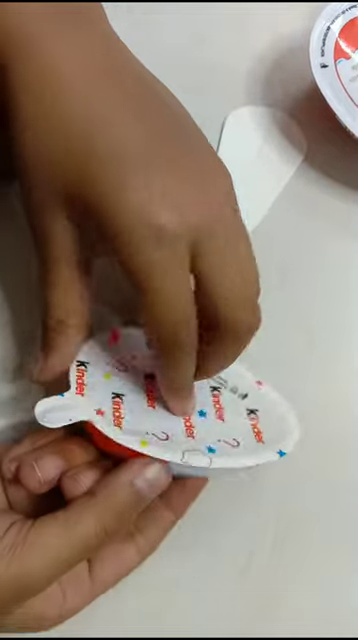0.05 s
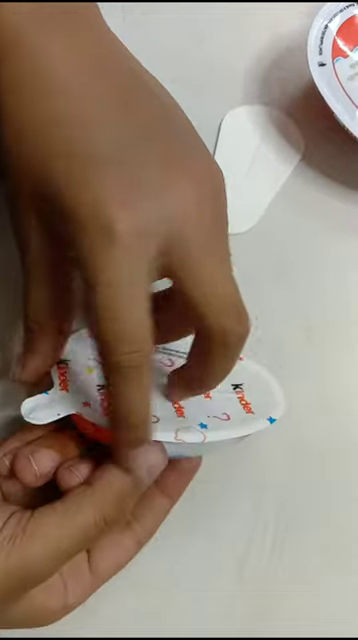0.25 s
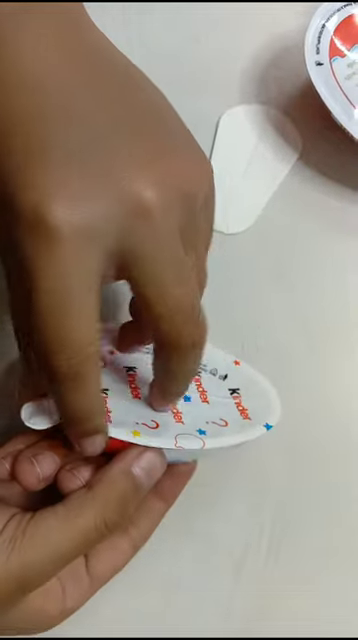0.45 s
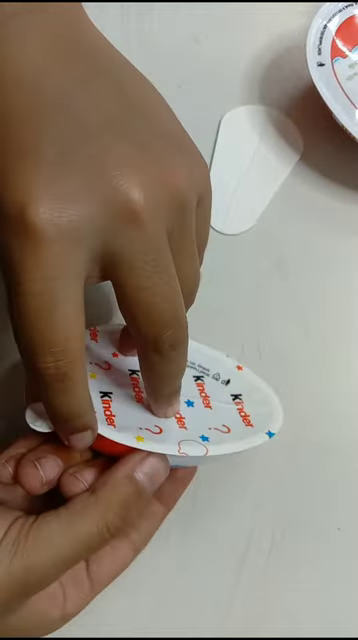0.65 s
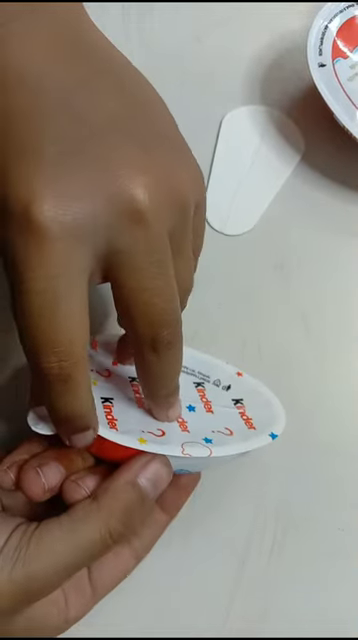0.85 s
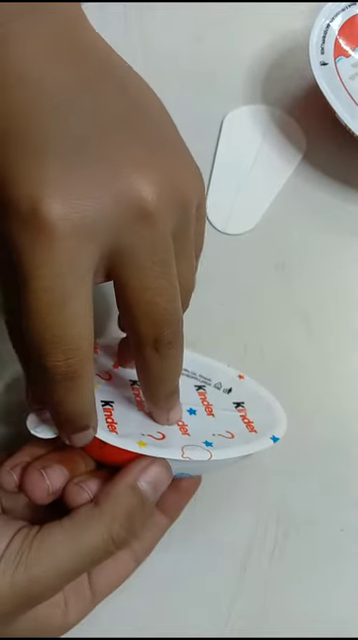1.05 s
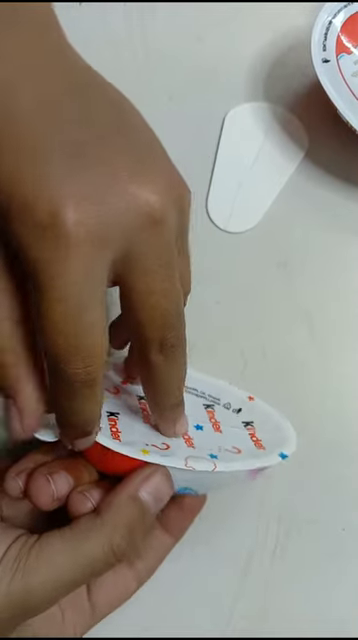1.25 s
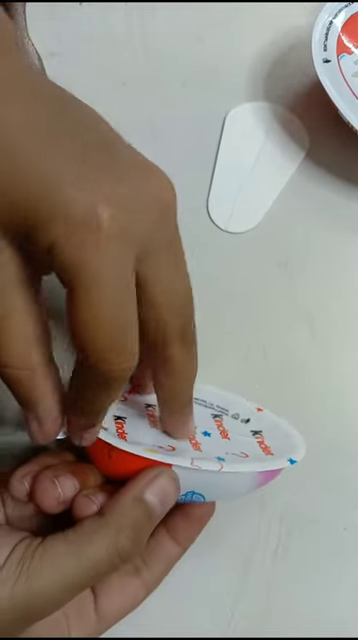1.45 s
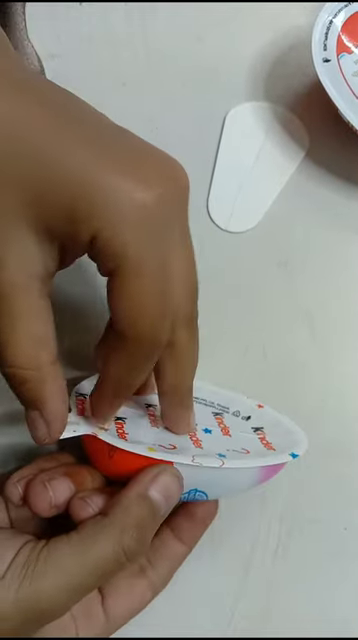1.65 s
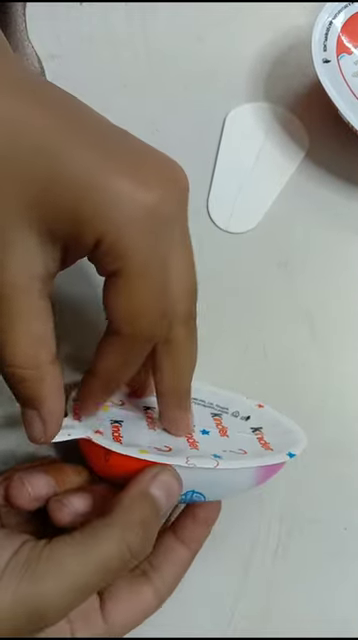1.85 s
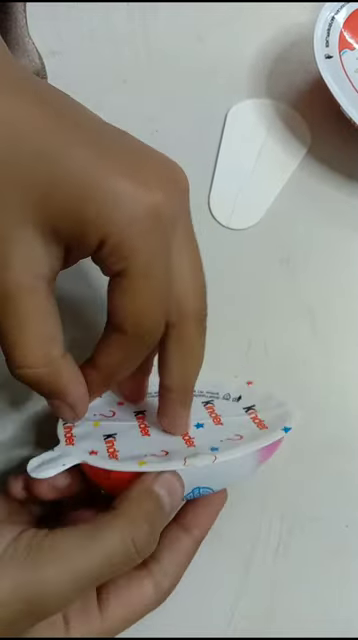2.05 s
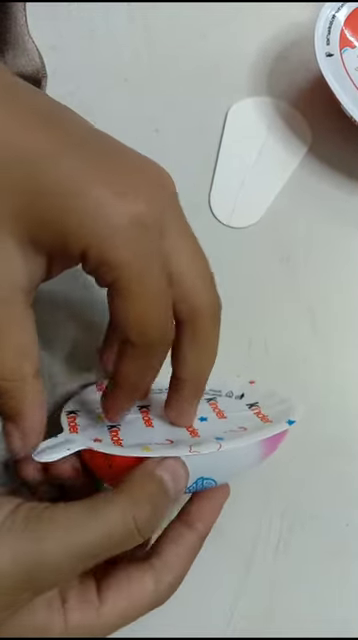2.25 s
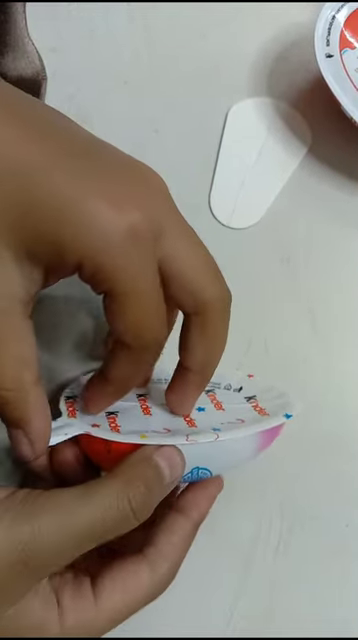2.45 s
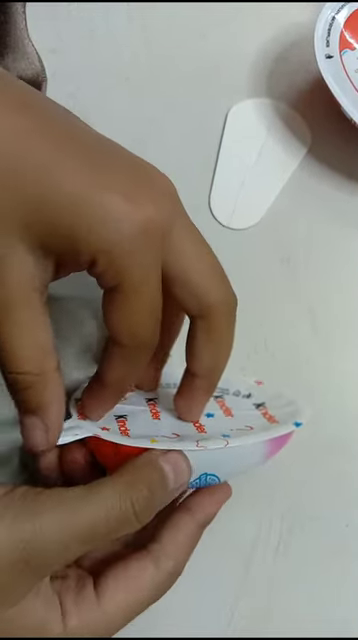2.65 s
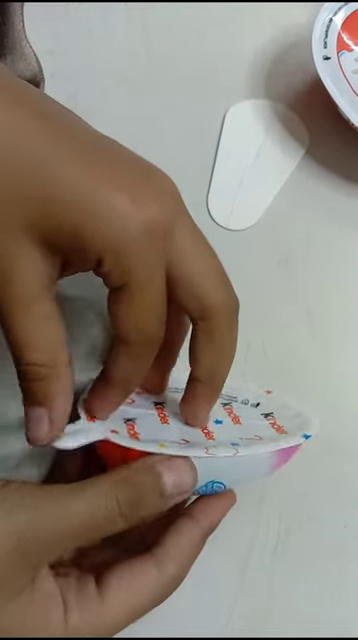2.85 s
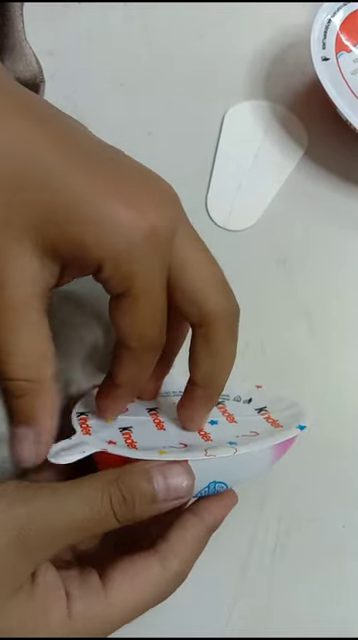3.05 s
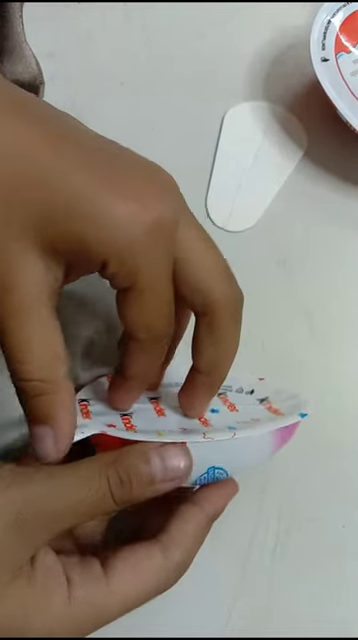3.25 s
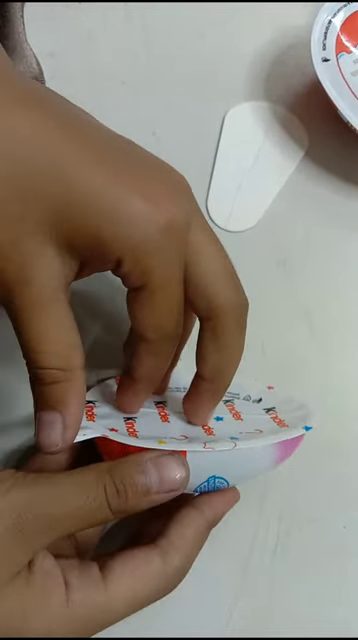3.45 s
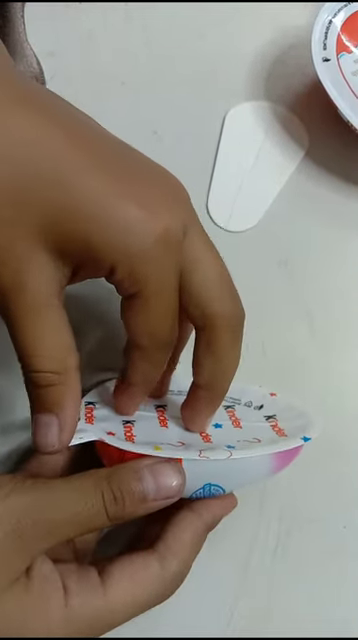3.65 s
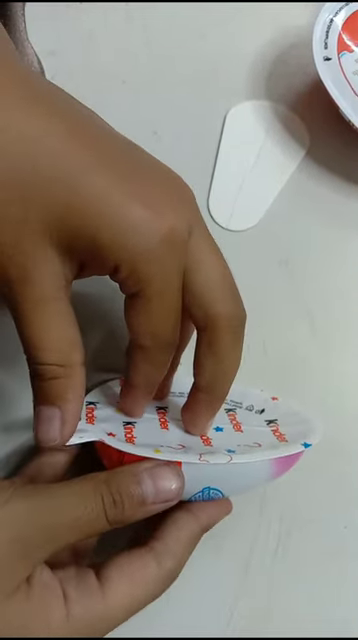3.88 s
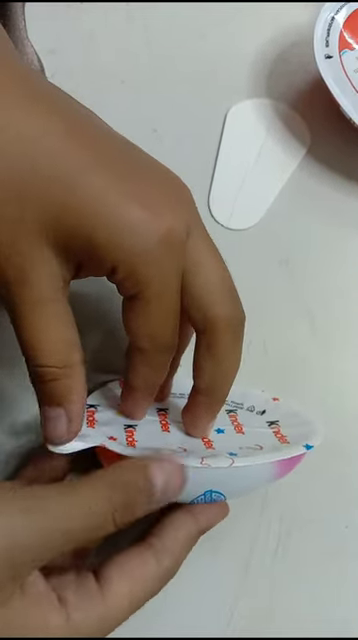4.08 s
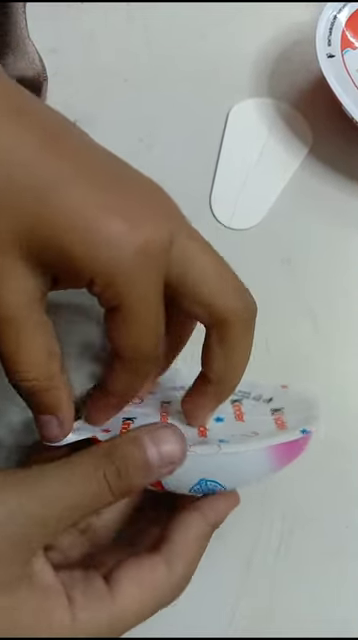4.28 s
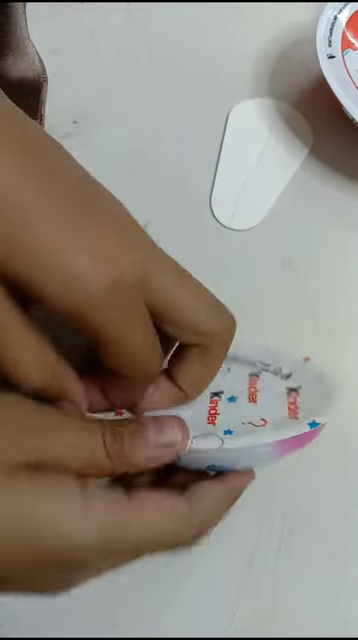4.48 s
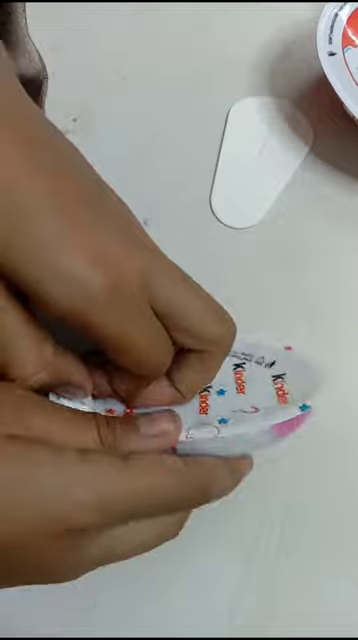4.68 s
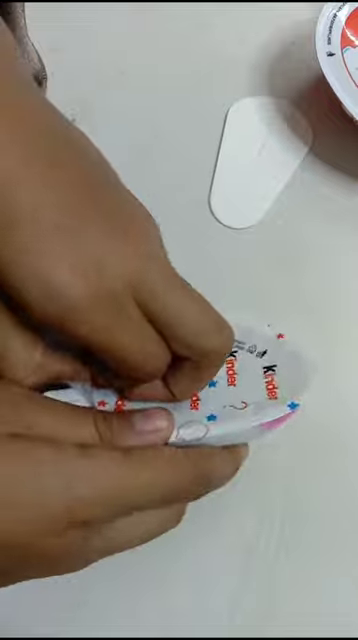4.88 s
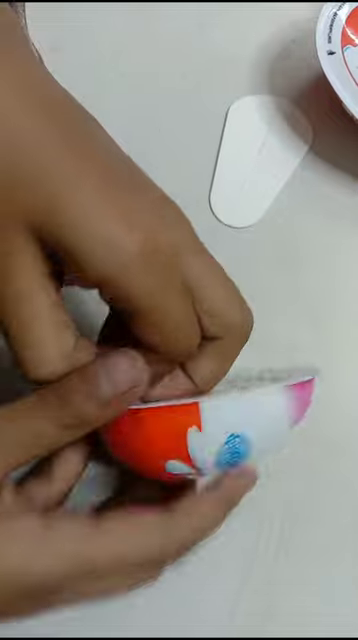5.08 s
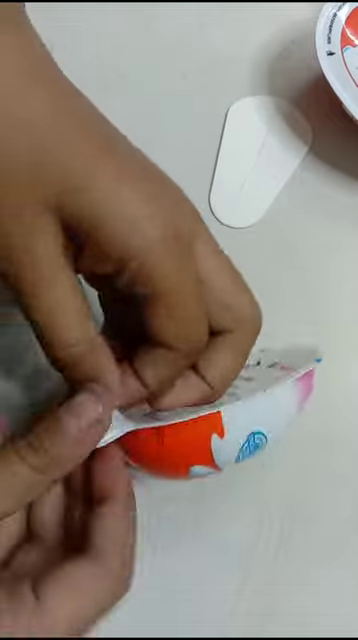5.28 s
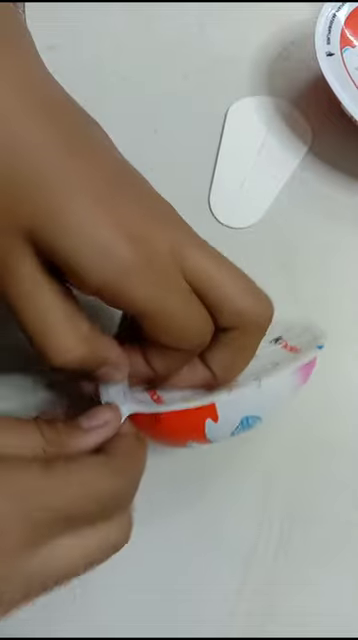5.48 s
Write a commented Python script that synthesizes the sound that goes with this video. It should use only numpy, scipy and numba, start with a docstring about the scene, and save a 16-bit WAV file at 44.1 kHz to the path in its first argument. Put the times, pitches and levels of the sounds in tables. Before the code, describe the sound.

Fingers rub and pick at a foil seal on a hollow plastic shell, faint crinkles building to sharp clicks and snaps.

```python
"""A quiet room, a table, a phone's microphone close by: fingers pick at the foil seal of a hollow plastic shell.
Skin rubs the foil in dense tiny slips: uneven noise through the modes of foil, shell wall and hollow.
The tab snaps in noise bursts of a few ms; the air in the shell hums as noise in a narrow gliding band.
The table thrums under the wrists as one noise-driven mode over a rumble. A short diffuse tail follows the
hands; smooth hiss and faint steady tones lie beneath."""
import sys
import numpy as np
from scipy import signal
from scipy.fft import rfft, irfft, next_fast_len
from scipy.io import wavfile
from scipy.ndimage import uniform_filter1d
from numba import njit

SR = 44100
rng = np.random.default_rng(int(sys.argv[2]) if len(sys.argv) > 2 else 0)


def to_wav(s):
    """Save 16-bit WAV."""
    ch = np.atleast_2d(s).T  # columns
    pcm = np.round(np.clip(ch, -1, 1) * 32767)  # PCM
    wavfile.write(sys.argv[1], SR, pcm.astype(np.int16))


N = 243608

# room hiss, spectrum shape: (frequency [Hz], relative density [dB])
HISS_SPECTRUM = [(30, -25.5), (55, -24.5), (90, -2), (270, 1.5), (400, -1), (520, -16), (700, -21.5),
                 (1700, -13.5), (2050, -17.5), (2420, -27), (2600, -20), (5500, -27.5), (7600, -32.5),
                 (8200, -39.5), (13000, -42.5), (15500, -48)]
HISS_DB = -71.5
# faint steady tones in the room: (frequency [Hz], width [Hz], rms level [dB])
ROOM_TONES = [(495, 3.5, -75), (543, 2, -80), (2130, 11, -81), (2327, 4.6, -78.5), (5250, 60, -92)]

# strokes of the fingers: (time at full level [s], rise [s], hold [s], fall [s], foil's low modes [dB],
# foil's high modes [dB], sheen [dB], dull scuff [dB], pitch of the bent patch [Hz])
FINGER_STROKES = [ (0.042, 0.092, 0.022, 0.05, -48.5, -49.5, -63, -66, 5300),
                  (0.142, 0.096, 0.063, .05, -65, -66, -85, -75.5, 5800),
                  (0.235, 0.031, 0.045, 0.044, -67.5, -61, -78.5, -70, 5440),
                  (0.389, 0.065, .06, .04, -79.5, -75, -95, -84, 5500),
                  (0.553, 0.053, .02, 0.044, -82, -79, -102, -75, 3950),
                  (0.635, 0.056, 0.02, .07, -69, -82, -96, -77, 5400),
                  (0.819, 0.03, 0.046, 0.088, -71.5, -77.5, -96, -70.5, 5000),
                  (0.886, 0.018, .06, .03, -85, -79.5, -100, -79, 3200),
                  (1.101, .03, 0.024, 0.069, -72.5, -78.5, -102, -78, 7000),
                  (1.281, 0.095, 0.081, 0.025, -47.5, -51, -64.5, -64.5, 5250),
                  (1.42, 0.14, .10, 0.044, -56, -60, -74, -69.5, 5300),
                  (1.674, .03, 0.01, 0.027, -73, -66.5, -93, -78, 4130),
                  (2.114, 0.019, 0.0027, 0.011, -45, -45, -62, -48, 4900),
                  (2.12, .005, 0.013, 0.09, -63, -62.5, -69.5, -70, 3700),
                  (2.287, .03, 0.008, 0.022, -74, -79, -94, -71, 4600),
                  (2.514, 0.039, 0.025, 0.073, -58.5, -58, -88, -57, 3800),
                  (2.654, .02, .005, 0.016, -78, -78, -97, -74, 4860),
                  (2.687, .04, 0.054, 0.056, -103, -80, -97, -88, 5500),
                  (2.809, 0.063, .02, 0.034, -75.5, -66, -85, -88, 5450),
                  (2.953, .01, 0.0068, 0.02, -47.5, -53, -65, -54, 6000),
                  (2.987, .005, .005, .07, -59, -60, -78, -65, 5900),
                  (3.06, 0.043, .04, .05, -74.5, -83.5, -92, -70.5, 5250),
                  (3.285, 0.064, 0.053, .03, -71.5, -65.5, -86, -68.5, 4500),
                  (3.57, 0.027, 0.043, .08, -78, -99, -105, -70, 5800),
                  (3.623, 0.0058, 0.015, 0.075, -82.5, -71, -87, -70, 5900),
                  (3.709, .04, 0.03, .06, -81, -86, -103, -73, 4000),
                  (3.96, 0.041, .07, 0.0083, -79.5, -84, -105, -75, 3760),
                  (4.053, 0.004, .005, 0.047, -64.5, -80, -89, -69, 4400),
                  (4.119, 0.0092, 0.0042, .02, -80, -68, -94, -82, 4960),
                  (4.162, 0.046, 0.018, .01, -81, -74.5, -96, -83, 4400),
                  (4.197, 0.012, 0.016, 0.022, -45, -58.5, -90, -80, 4400),
                  (4.237, 0.0093, 0.063, 0.066, -64.5, -69, -89, -75, 5000),
                  (4.377, 0.03, 0.042, .02, -67, -65.5, -85, -79, 4100),
                  (4.438, 0.007, 0.046, .03, -59, -51.5, -70, -54.5, 4400),
                  (4.5, .01, 0.067, 0.083, -65, -65, -83, -63.5, 5200),
                  (4.728, .005, 0.0078, .14, -45.5, -50.5, -73, -52.5, 4000),
                  (4.857, .008, 0.012, .02, -44, -49, -48, -56, 4350),
                  (4.903, .005, 0.072, 0.12, -59, -60.5, -76, -58, 4000),
                  (5.121, 0.086, 0.0057, .02, -53, -55, -68.5, -62, 5100),
                  (5.147, 0.017, 0.064, .03, -50.5, -48.5, -64, -62, 4800),
                  (5.224, 0.083, 0.021, 0.0083, -38.5, -41.5, -59, -64, 4620),
                  (5.254, .01, 0.022, .04, -52.5, -61.5, -84, -63, 4200),
                  (5.316, 0.037, 0.01, .03, -49.5, -54, -79, -58, 3830),
                  (5.344, .008, 0.014, 0.019, -41, -44.5, -72, -55, 4030),
                  (5.373, .005, 0.016, 0.078, -58, -58.5, -82, -62.5, 4270),
                  (5.463, 0.023, 0.016, 0.086, -63, -61.5, -81.5, -60, 4400),
                  (5.509, 0.021, 0.0029, 0.016, -48, -58, -92, -64, 4340)]
STROKE_EDGE_DB = 25  # climb over one rise time, drop over one fall time
GRIP_DB = [-97.5, -104.5, -106, -80.5]  # resting fingers: low modes, high modes, sheen, scuff
GRIP_SWAY_DB, GRIP_PATCH_HZ = 4.5, 4780
# lower modes of the foil: (frequency [Hz], width [Hz], relative level [dB])
FOIL_LOW_MODES = [(1825, 130, -1.5), (2293, 154, 1.5), (2524, 760, -12.5)]
# upper modes of the foil: (frequency [Hz], width [Hz], relative level [dB])
FOIL_HIGH_MODES = [(3400, 260, -2), (3750, 200, -3), (4250, 280, 0), (4850, 200, -5), (5450, 280, -1),
                   (5900, 280, 0), (6600, 300, -2), (7300, 350, -4)]
# glassy top of the foil: (frequency [Hz], width [Hz], relative level [dB])
SHEEN_MODES = [(8880, 430, 5.5), (11100, 710, -0.5), (11700, 770, -9.5)]
# dull shell wall: (frequency [Hz], width [Hz], relative level [dB])
WALL_MODES = [(559, 120, 11), (870, 58, 12.5), (1032, 270, -6.5)]
HOLLOW_HZ, HOLLOW_WIDTH_HZ = 1275, 85

# hum of the air in the shell: (time [s], level [dB], pitch [Hz])
HOLLOW_HUM = [(0.0, -64, 1242), (0.25, -79, 1259), (1.1, -74.5, 1290), (1.22, -63, 1240),
              (1.38, -60.5, 1316), (1.55, -75, 1223), (1.75, -66, 1250), (2.27, -74, 1190),
              (2.5, -81, 1193), (2.84, -79.5, 1232), (3.15, -71.5, 1257), (3.4, -82, 1270),
              (3.55, -70, 1262), (4.03, -77, 1210), (4.73, -71, 1302), (4.87, -47, 1270),
              (5.0, -58.5, 1271), (5.26, -94.5, 1316), (5.37, -50.5, 1390), (5.52, -84, 1326)]

# wrists pressing on the table: (time of the peak [s], length [s], table mode [dB], rumble [dB])
WRIST_LEANS = [(0.042, 0.15, -64, -62), (0.206, 0.084, -61, -67), (0.297, 0.081, -56, -64),
               (0.423, 0.089, -67, -73), (0.508, 0.039, -60, -63), (0.637, 0.13, -53.5, -56.5),
               (0.985, 0.14, -58.5, -63.5), (1.102, 0.18, -62.5, -64.5), (1.241, .09, -50.5, -64),
               (1.374, 0.073, -50, -60), (1.512, 0.19, -56, -65), (1.538, 0.062, -47, -60),
               (1.753, 0.11, -57, -63.5), (1.848, 0.05, -58.5, -72), (2.14, 0.18, -65.5, -64.5),
               (2.543, 0.096, -74, -61), (2.857, .07, -69, -71), (3.008, 0.084, -48.5, -67.5),
               (3.094, 0.086, -43.5, -59), (3.196, 0.089, -54.5, -66.5), (3.264, 0.046, -51.5, -67.5),
               (3.326, 0.056, -66.5, -54), (3.362, 0.04, -57.5, -65), (3.66, 0.16, -65, -64.5),
               (4.24, 0.091, -65, -70), (4.384, 0.16, -58, -61.5), (4.468, 0.086, -55.5, -70),
               (4.513, 0.08, -72, -55.5), (4.598, 0.1, -57, -53.5), (4.78, 0.22, -65, -60),
               (4.897, 0.022, -43, -55), (4.984, 0.17, -54, -62.5), (5.186, .11, -49, -63),
               (5.276, 0.055, -45.5, -63), (5.377, 0.096, -51, -61), (5.486, 0.15, -50.5, -68)]
REST_DB, REST_SWAY_DB = [-76, -70.5], 3.0  # table mode and rumble between presses
TABLE_HZ, TABLE_WIDTH_HZ = 266, 27

# snaps of the tab: (time [s], peak level [dB], centre [Hz], hollow [dB], thud [dB], sheen [dB],
# rise [ms], fade [ms])
TAB_SNAPS = [(0.8162, -70, 2230, -51, -63, -85, 0.9, 1.6), (1.047, -66, 6800, -80, -78, -82, .6, 1),
             (1.069, -60, 7100, -87, -85, -90, .6, 2.4), (1.083, -60, 7100, -85, -85, -90, 0.54, 1.5),
             (2.0735, -31.5, 6100, -60, -55, -56.5, 0.66, 2.8),
             (2.0887, -20, 4330, -53, -49, -41.5, 0.58, 1.1),
             (2.117, -16, 6510, -34, -35.5, -28, 0.3, 1.77), (2.9538, -38, 2016, -44, -44, -51, 1, 3.1),
             (2.981, -33.5, 5700, -70, -51, -53, 1, 2.3),
             (3.623, -56.5, 6000, -64.5, -74, -71.5, 0.96, 0.94),
             (4.0428, -42.5, 5850, -71, -68, -58, 0.52, 0.48),
             (4.0471, -29.5, 5600, -56.5, -61, -56.5, 0.92, 0.72),
             (4.1157, -60, 2180, -77, -73, -85, 0.71, 1.1), (4.1986, -39, 1890, -65, -60, -79, 0.78, 1.8),
             (4.208, -39, 1760, -53, -54, -76, 0.93, 0.74),
             (4.2884, -50.5, 2420, -69, -62, -56.5, 0.53, 6.2),
             (4.3737, -52, 2290, -58, -70, -84, 0.8, 0.87), (4.443, -41, 1970, -49, -65, -68, 0.62, 0.28),
             (4.4844, -38.5, 4220, -47, -61, -70, 0.88, 3.6),
             (4.6933, -14, 4620, -40, -35, -36.5, 0.97, 1.35),
             (4.7113, -38, 2420, -32, -34.5, -52, 0.41, 1), (4.7221, -20.5, 1920, -31, -30.5, -55, 0.45, 2),
             (4.838, -7.5, 1930, -23, -39, -17.5, 0.69, 2.2), (4.8397, -6, 3500, -15, -47, -19, 0.64, 0.42),
             (4.879, -47, 1740, -24.5, -57, -38, 0.97, 3.8), (4.892, -9.5, 3580, -30, -27, -36, 0.9, 1.33),
             (5.1389, -35, 5700, -64, -44, -50, 0.56, 1.1),
             (5.148, -25.5, 2500, -35, -48.5, -52, 0.92, 0.44),
             (5.2724, -56, 1990, -39.5, -65, -74, 0.25, 0.9),
             (5.3368, -32.5, 1750, -42, -42.5, -69.5, 0.8, 2), (5.4652, -38, 1850, -70, -49, -63, 0.27, 1),
             (5.4806, -50, 1830, -53, -46, -77, 0.75, 1.8), (5.5068, -39, 2340, -42, -37.5, -81, 0.63, 2)]

ROOM_T60_S, ROOM_DB, ROOM_TOP_HZ = 0.27, -20.5, 6950
TREBLE_HZ, TREBLE_WIDTH_HZ, TREBLE_DB = 14800, 890, -1
TOP_HZ = 16300


def undb(db):
    """Gain of a level in dB."""
    return 10 ** (np.asarray(db) / 20)


def unit(x):
    """Scaled to rms 1."""
    return x / np.sqrt(np.mean(x ** 2))


def curves(table):
    """Columns of a timed table, drawn as straight lines over the whole length."""
    s, *columns = np.transpose(table)
    return [np.interp(np.arange(N) / SR, s, c) for c in columns]


def ring(x, hz, width_hz):
    """One resonance, gain 1 at its centre."""
    return signal.lfilter(*signal.iirpeak(hz, hz / width_hz, fs=SR), x)


def body(x, modes):
    """Sum of resonances, neighbours in opposite sign."""
    return sum((-1) ** k * undb(db) * ring(x, hz, width) for k, (hz, width, db) in enumerate(modes))


def band(x, lo_hz, hi_hz):
    """Steep band-pass."""
    return signal.sosfilt(signal.butter(4, [lo_hz, hi_hz], "bandpass", fs=SR, output="sos"), x)


def walk(rate):
    """Random levels held 1 / rate s and smoothed twice."""
    k = int(SR / rate)
    steps = np.repeat(rng.standard_normal(N // k + 1), k)
    return uniform_filter1d(uniform_filter1d(steps, k), k)[:N]


@njit
def glide(x, hz, width):
    """State-variable band-pass with a moving centre; width as a share of it."""
    y, b, l = np.empty(len(x)), 0., 0.
    for i in range(len(x)):
        g = np.tan(np.pi * hz[i] / SR)
        v = (b + g * (x[i] - l)) / (1 + g * (g + width))
        b, l, y[i] = 2 * v - b, l + 2 * g * v, width * v
    return y


def quiet():
    """Room with nobody moving: smooth shaped hiss and a few narrow, breathy bands of noise."""
    hz, db = np.transpose(HISS_SPECTRUM)
    size = next_fast_len(N)
    log_f = np.log(np.fft.rfftfreq(size, 1 / SR) + 1)
    shape = undb(np.interp(log_f, np.log(hz), db, left=-30, right=-120))
    hiss = irfft(rfft(rng.standard_normal(size)) * shape, size)[:N]
    air = rng.standard_normal(N)
    tones = sum(undb(d) * unit(ring(air, tone_hz, width_hz)) for tone_hz, width_hz, d in ROOM_TONES)
    return undb(HISS_DB + 1.2 * walk(4.9)) * unit(hiss) + tones


def strokes():
    """Gains of the four rubbed layers and pitch of the bent patch; stroke powers add to the resting grip."""
    t = np.arange(N) / SR
    s, rise, hold, fall, *layers_db, hz = np.transpose(FINGER_STROKES)
    sway = GRIP_SWAY_DB * np.array([walk(8) for _ in GRIP_DB])
    power = undb(np.array(GRIP_DB)[:, None] + sway) ** 2
    weight = power[1].copy()
    bend = GRIP_PATCH_HZ * weight
    for k in range(len(FINGER_STROKES)):
        start = max(int((s[k] - 2 * rise[k]) * SR), 0)
        i = slice(start, int((s[k] + hold[k] + 2 * fall[k]) * SR))
        before = (s[k] - t[i]) / rise[k]
        after = (t[i] - s[k] - hold[k]) / fall[k]
        away = np.maximum(np.maximum(before, after), 0)
        stroke = undb(np.array(layers_db)[:, k, None] - STROKE_EDGE_DB * away) ** 2
        power[:, i] += stroke
        bend[i] += hz[k] * stroke[1]
        weight[i] += stroke[1]
    gains = uniform_filter1d(np.sqrt(power), size=200, axis=1)
    return gains, bend / weight  # strokes strong in the high modes weigh most in the bend


def fingers():
    """Dense slips of uneven size excite the foil, the shell wall and its hollow."""
    gains, patch_hz = strokes()
    slip_db = 2.2 * rng.exponential(size=N) + 2 * walk(250) + walk(60)
    slips = rng.standard_normal(N) * undb(slip_db)
    # the bent patch favours the foil modes near its pitch
    high = body(slips + 2.5 * glide(slips, patch_hz, .3), FOIL_HIGH_MODES)
    low = unit(band(body(slips, FOIL_LOW_MODES), 1300, 3200))
    low = low + .5 * unit(ring(slips, HOLLOW_HZ, HOLLOW_WIDTH_HZ))
    sheen = band(body(slips, SHEEN_MODES), 8500, 12500)
    scuff = body(slips, WALL_MODES)
    layers = low, band(high, 2700, 8500), sheen, scuff
    return sum(g * unit(x) for g, x in zip(gains, layers))


def hollow():
    """Air in the shell: uneven noise through a wide, then a narrow resonance that glide in pitch."""
    hum_db, hum_hz = curves(HOLLOW_HUM)
    air = rng.standard_normal(N) * undb(2 * walk(40))
    hum = glide(glide(air, hum_hz, 0.45), hum_hz, 0.032)
    return undb(hum_db) * unit(hum)


def table():
    """Shifting wrists shake the table: one strong mode over a loose rumble; each press swells and ebbs."""
    t = np.arange(N) / SR
    sway = REST_SWAY_DB * np.array([walk(9.5) for _ in REST_DB])
    power = undb(np.array(REST_DB)[:, None] + sway) ** 2
    for s, length, *db in WRIST_LEANS:
        power = power + undb(db)[:, None] ** 2 * np.exp(-(3.5 * (t - s) / length) ** 2)
    mode, rumble = np.sqrt(power)
    push = rng.standard_normal((2, N))
    thrum = ring(ring(push[0], TABLE_HZ, 2 * TABLE_WIDTH_HZ), TABLE_HZ, TABLE_WIDTH_HZ)
    # the mode is driven steadily: half of its chance swings in dB are evened out
    thrum = thrum / uniform_filter1d(thrum ** 2, size=1500) ** .25
    return mode * unit(thrum) + rumble * unit(band(push[1], 65, 210))


def tab():
    """Each snap is a burst of a few ms, coloured by the bent foil; it knocks hollow and wall."""
    s, db, hz, hollow_db, thud_db, sheen_db, rise_ms, fade_ms = np.transpose(TAB_SNAPS)[:, :, None]
    ms = np.arange(SR // 20) / SR * 1000
    noise = rng.standard_normal((len(TAB_SNAPS), len(ms)))
    spiky = noise * undb(2.4 * np.abs(noise))
    swell = np.minimum(ms / np.maximum(rise_ms, .1), 1) ** 2
    fade = np.exp(-np.maximum(ms - rise_ms, 0) / np.maximum(fade_ms, .2))
    # one sharp crack where the glue lets go
    knock = np.exp(-((ms - rise_ms) / 0.033) ** 2)
    burst = spiky * swell * fade - 3.65 * knock
    patch = np.array([ring(b, f[0], .35 * f[0]) for b, f in zip(burst, hz)])
    foil = patch + .5 * body(burst, FOIL_LOW_MODES) + .5 * body(burst, FOIL_HIGH_MODES) + .15 * burst
    parts = [(db, band(foil, 1450, 8730)),
             (hollow_db, ring(knock, HOLLOW_HZ, HOLLOW_WIDTH_HZ)),
             (thud_db, body(burst, WALL_MODES)),
             (sheen_db, band(0.3 * burst + body(burst, SHEEN_MODES), 9400, 20000))]
    # each part is set to its own peak level
    snaps = sum(undb(d) * x / np.abs(x).max(axis=1, keepdims=True) for d, x in parts)
    out = np.zeros(N + SR)
    for at, snap in zip(s[:, 0], snaps):
        start = int(at * SR)
        out[start:start + len(ms)] += snap
    return out[:N]


def room(x):
    """Walls return a diffuse tail: softly swelling, exponentially fading noise with its treble rolled off."""
    t = np.arange(SR // 2) / SR
    fade = np.exp(-np.log(1000) * t / ROOM_T60_S) * np.minimum(t / 0.011, 1) ** 2
    tail = signal.lfilter(*signal.butter(1, ROOM_TOP_HZ, fs=SR), rng.standard_normal(len(t)) * fade)
    return undb(ROOM_DB) * signal.fftconvolve(x, tail / np.sqrt(np.sum(tail ** 2)))[:N]


def scene():
    """Hands and shell close by with their room tail; table and quiet beneath, without it."""
    hands = fingers() + hollow() + tab()
    return (hands + room(hands) + table() + quiet())[None]


def record(dry):
    """A resonance lifts the treble near 14.8 kHz; a steep low-pass closes the sound above 16.3 kHz."""
    lifted = dry + undb(TREBLE_DB) * ring(dry, TREBLE_HZ, TREBLE_WIDTH_HZ)
    return signal.sosfilt(signal.ellip(8, .2, 70, TOP_HZ, fs=SR, output="sos"), lifted)


dry = scene()
out = record(dry)
to_wav(out)
```